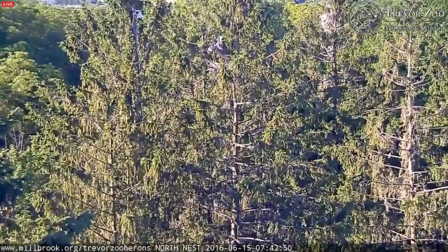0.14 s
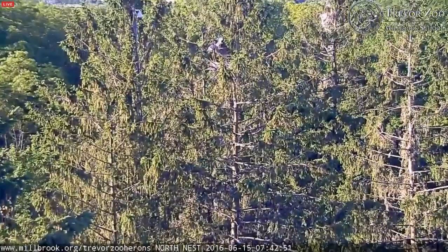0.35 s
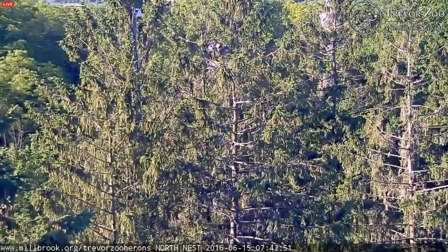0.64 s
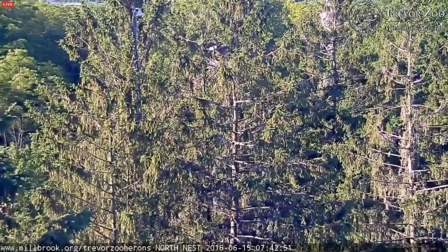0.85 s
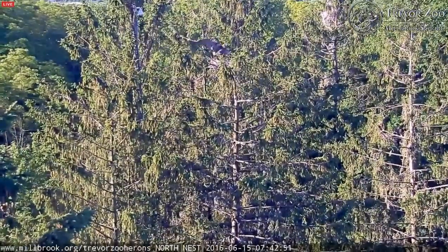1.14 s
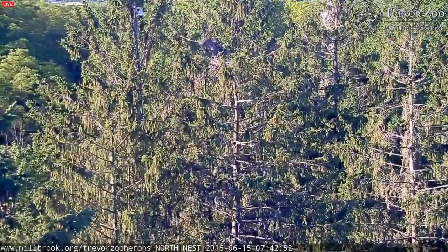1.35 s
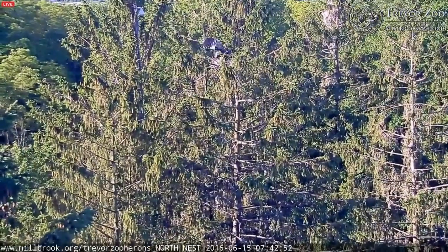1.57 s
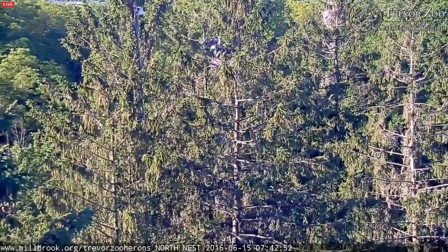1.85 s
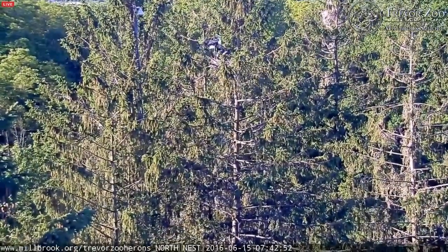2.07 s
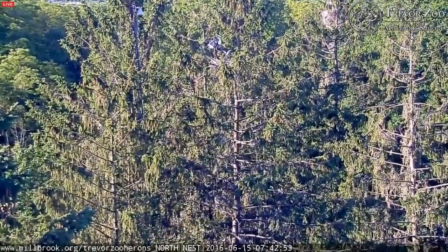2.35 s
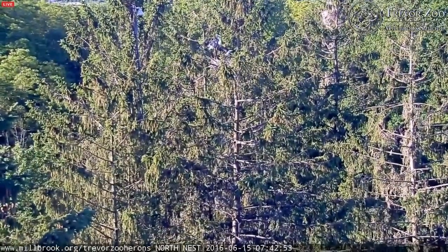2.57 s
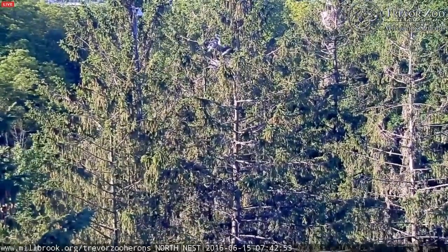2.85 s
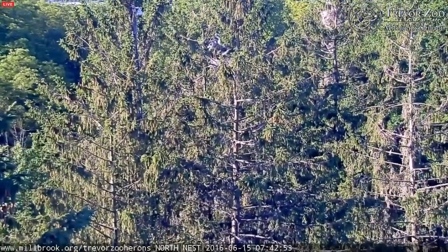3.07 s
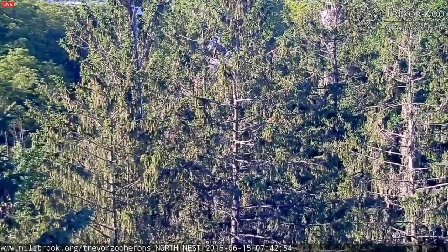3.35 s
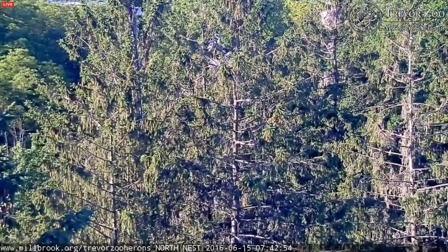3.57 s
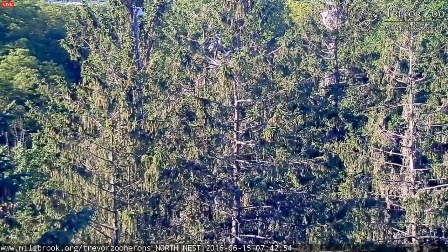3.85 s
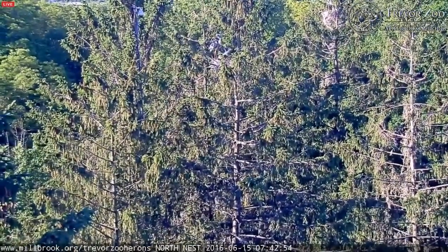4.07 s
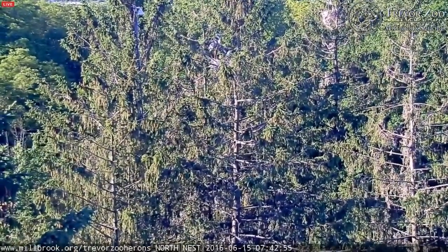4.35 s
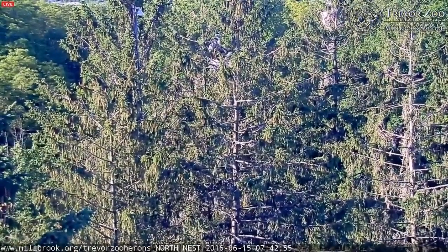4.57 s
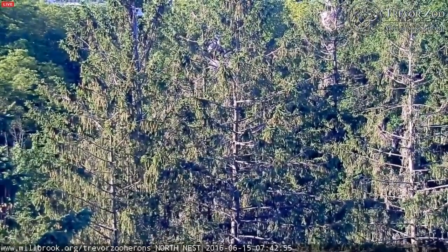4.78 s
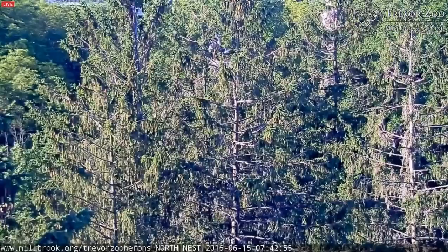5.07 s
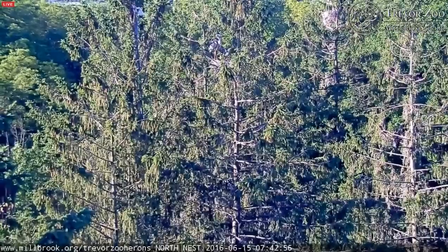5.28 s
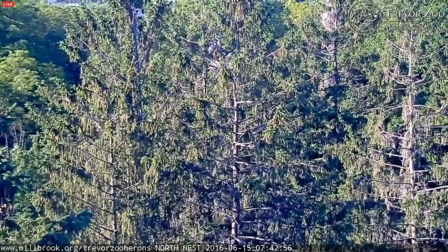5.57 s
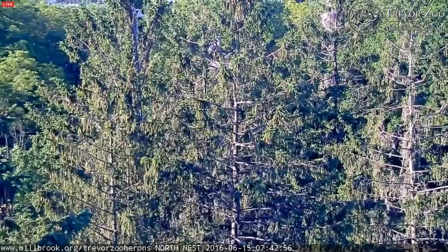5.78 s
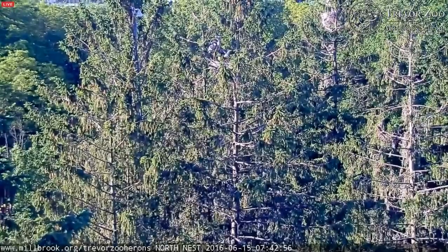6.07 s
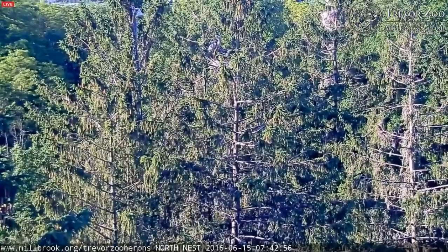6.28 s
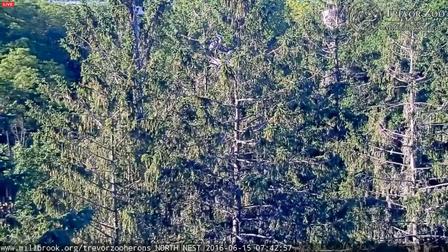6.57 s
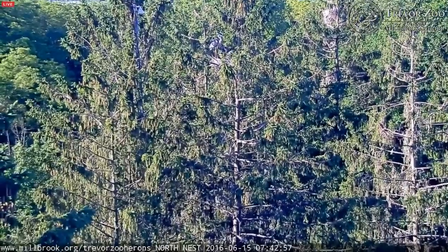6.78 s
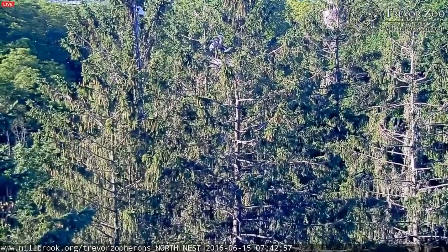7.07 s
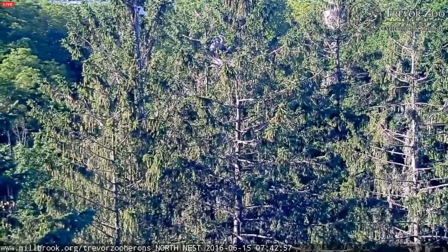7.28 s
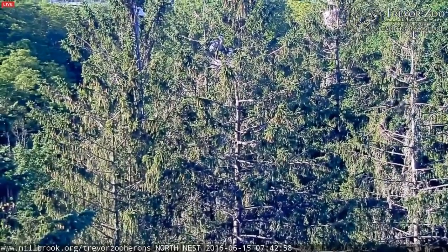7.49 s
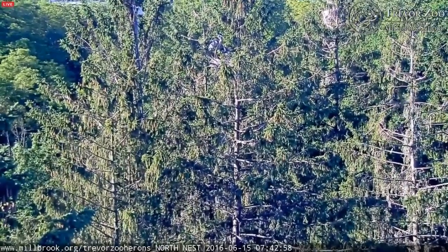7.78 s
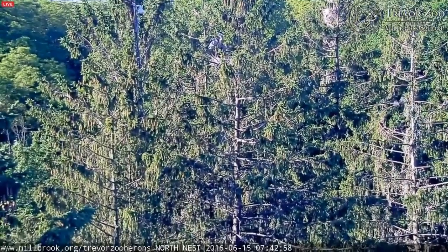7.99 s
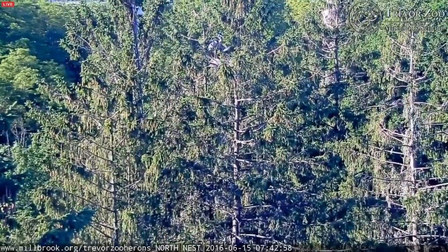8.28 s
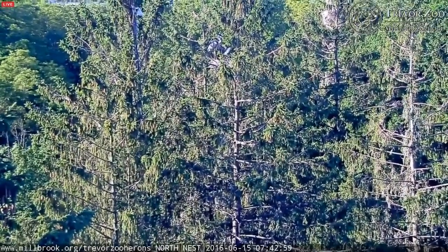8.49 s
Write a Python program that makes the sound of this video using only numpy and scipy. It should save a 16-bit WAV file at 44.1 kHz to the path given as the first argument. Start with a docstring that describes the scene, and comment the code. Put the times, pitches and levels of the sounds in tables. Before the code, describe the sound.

Heron chicks beg in rapid runs of harsh, clicking rattles from a treetop nest, with faint songbirds behind.

```python
"""Harsh begging calls of heron nestlings in a treetop: each opens with a tick, swells into a rattle and
trails off dully. Uneven throat pulses are the source; chest, throat and gape resonances are the filter.
A smaller chick squeaks between, soft gulps close some calls and a bill snaps once. Far songbirds
whistle and twitter, scattered by the trees. Leaves hiss, distant machinery hums, wind buffets the
microphone and an insect holds a thin high note."""
import sys
import numpy as np
from scipy import signal
from scipy.fft import rfft, irfft, next_fast_len
from scipy.io import wavfile
from scipy.ndimage import uniform_filter1d

SR = 44100
rng = np.random.default_rng(int(sys.argv[2]) if len(sys.argv) > 2 else 0)


def dump_mix(stems):
    """Bounce the given channels to the path in sys.argv[1] as a 16-bit WAV at rate SR."""
    frames = np.atleast_2d(stems).T  # one column per channel
    limited = np.clip(frames, -1, 1)  # hard clip at full scale
    pcm = np.round(limited * 32767).astype(np.int16)
    wavfile.write(sys.argv[1], SR, pcm)


N = 380583

# Begging calls, levels relative: start_s, tick_db, wait_s, nominal_rattle_s, rattle_db
BEGGING_CALLS = [(0.0351, -38, 0.018, 0.011, -30.5), (0.1892, -51.5, 0.0081, 0.021, -43),
                 (0.328, -52, 0.014, 0.019, -32), (0.4882, -51.5, 0.013, 0.016, -35.5),
                 (0.636, -56, 0.0037, 0.042, -37.5), (0.7869, -43.5, 0.009, 0.031, -37),
                 (0.9646, -35, 0.0039, 0.024, -33.5), (1.1248, -41, 0.0037, 0.04, -35),
                 (1.2986, -24.5, 0.0015, 0.024, -27), (1.4458, -35.5, 0.012, 0.021, -28),
                 (1.6019, -30, 0.0037, 0.034, -29), (1.659, -49, 0.00086, 0.029, -44),
                 (1.705, -50, 0.0009, 0.0052, -47), (2.06, -44, 0.001, 0.0052, -56),
                 (2.101, -68, 0.0011, 0.014, -56), (2.225, -40.5, 0.0011, 0.0038, -42),
                 (2.369, -37, 0.0039, 0.033, -43.5), (2.5024, -41.5, 0.002, 0.0087, -55.5),
                 (2.6197, -49.5, 0.001, 0.012, -54.5), (2.784, -48, 0.001, 0.012, -62),
                 (3.059, -45, 0.001, 0.025, -47.5), (3.2132, -48.5, 0.0045, 0.014, -58),
                 (3.316, -60.5, 0.0047, 0.005, -66), (3.3434, -53, 0.0026, 0.011, -53.5),
                 (3.4514, -45, 0.001, 0.0058, -47.5), (3.473, -70, 0.0037, 0.0088, -59),
                 (3.69, -62, 0.002, 0.0052, -59), (3.9677, -48, 0.015, 0.013, -36.5),
                 (4.1014, -47, 0.012, 0.031, -39), (4.233, -45, 0.007, 0.041, -39.5),
                 (4.3764, -37, 0.0026, 0.048, -32), (4.524, -47, 0.0023, 0.051, -37.5),
                 (4.6743, -50, 0.0039, 0.05, -41), (4.8465, -35.5, 0.0037, 0.033, -41),
                 (5.179, -48, 0.0051, 0.017, -48.5), (5.262, -31.5, 0.001, 0.038, -33.5),
                 (5.4033, -46, 0.0084, 0.046, -38.5), (5.576, -48, 0.0077, 0.03, -37.5),
                 (5.7327, -41, 0.004, 0.042, -39), (5.885, -45, 0.0043, 0.044, -34),
                 (6.0425, -46, 0.0061, 0.043, -39), (6.1995, -44.5, 0.01, 0.037, -36),
                 (6.3518, -45.5, 0.0054, 0.051, -39.5), (6.5161, -41.5, 0.0068, 0.039, -38.5),
                 (6.6761, -50, 0.0019, 0.043, -38.5), (6.8416, -42.5, 0.0054, 0.045, -42),
                 (7.011, -43, 0.0025, 0.044, -43), (7.3887, -41.5, 0.013, 0.023, -39),
                 (7.5329, -40.5, 0.0079, 0.032, -32.5), (7.6882, -45, 0.007, 0.041, -35.5),
                 (7.8521, -45, 0.0032, 0.043, -40.5), (8.006, -47, 0.013, 0.031, -39),
                 (8.1632, -46, 0.012, 0.031, -38.5), (8.32, -48, 0.0043, 0.042, -41.5),
                 (8.488, -45, 0.003, 0.038, -40)]
# Drift of the voice: time_s, pulse_rate_hz, chest_db, throat_db, rasp_db, nominal_gape_hz, trail_s
VOICE_DRIFT = [(0, 229.8, -16.5, -10.5, -32.5, 2890, 0.037), (1.0, 230.8, -18.5, -13.5, -32.5, 3093, 0.027),
               (1.65, 229, -22.5, -10, -30.5, 3015, .025), (2.0, 227.9, -27, -8, -26, 3040, 0.0085),
               (2.7, 227.1, -27, -20, -33, 2830, 0.018), (3.75, 230.5, -26, -17, -22, 3080, 0.0062),
               (3.952, 233.5, -15, -23, -26, 3120, 0.049), (4.3, 294.7, -17.5, -17, -26, 3020, 0.042),
               (4.549, 270, -18, -15, -27.5, 3050, .03), (4.899, 231.8, -15.5, -13.5, -26, 3030, 0.029),
               (5.268, 251.8, -19, -15, -24.5, 3150, 0.021), (5.449, 245.6, -16, -13.5, -26, 3140, 0.052),
               (5.798, 230.5, -18.5, -10.5, -35, 3060, 0.036), (6.3, 214.7, -18, -8, -30.5, 3180, 0.033),
               (7.0, 215.8, -16.5, -7.5, -29, 2954, 0.033), (7.6, 215.3, -16.5, -10.5, -36, 2994, 0.03),
               (8.5, 216.3, -17.5, -9, -25.5, 3024, 0.039)]
# Tilt that lifts the middle two gape resonances against the outer two: time_s, nominal_tilt_db
GAPE_TILT = [(0, 0.5), (1.7, 0), (3.7, 2), (4.0, 2.5), (4.45, 0.5), (4.6, 1.5), (5.3, 1.5), (5.9, 0),
             (6.4, -1), (7.0, 1.5), (8.5, -1)]
# Four groups of vocal tract resonances: centre_hz, width_hz, relative_gain_db
CHEST_MODES = [(260, 180, -1), (419, 82, 3), (645, 280, 1)]
THROAT_MODES = [(928, 225, -12.5), (1339, 189, 2), (1744, 264, 2.5)]
GAPE_MODES = [(2190, 140, -8.5), (2803, 272, 0.5), (3444, 477, -6.5), (4267, 578, -16)]
RASP_MODES = [(5540, 1160, 11), (7600, 6100, -6.5), (10350, 2600, -5)]
# Squeaks of the smaller chick: start_s, length_s, pitch_hz, source_db, throat_gain_db
SQUEAK_NOTES = [(2.654, 0.019, 672, -51, -15), (2.802, 0.015, 448, -50, -20), (2.953, 0.023, 445, -57, -20),
                (3.094, 0.022, 458, -55.5, -15)]
# Its timbre, one value per gape resonance: gain_db
SQUEAK_GAPE_DB = (4, 2.5, -8, -12)
# Gulps after some calls: start_s, level_db
GULP_NOTES = [(0.089, -72), (0.379, -61), (0.541, -66.5), (1.014, -66), (2.67, -67), (3.583, -69.5),
              (7.435, -72), (7.59, -76), (7.754, -81)]
# Bill snap: start_s, excitation_db
BILL_SNAPS = [(3.2894, -45)]
# Far songbird notes: start_s, length_s, start_hz, middle_hz, end_hz, relative_level_db
SONGBIRD_NOTES = [(.25, 0.15, 2550, 2580, 2460, -63), (.745, 0.045, 2420, 2430, 2360, -64),
                  (.91, 0.052, 2740, 2720, 2740, -62), (1.03, .05, 4490, 4240, 3950, -59),
                  (1.085, .04, 3900, 3600, 3440, -61), (1.37, 0.049, 3320, 3160, 3030, -54),
                  (4.91, 0.14, 2820, 2570, 2550, -63.5), (5.04, 0.087, 3840, 3800, 3920, -79),
                  (5.32, 0.054, 2730, 2630, 2510, -57), (5.838, 0.035, 3410, 3200, 3100, -55),
                  (5.97, 0.068, 3400, 4130, 3840, -61.5), (6.8, 0.1, 3360, 3280, 2950, -54)]
# Level of the loudest chirps of a flock further off: time_s, level_db
FLOCK_LEVELS = [(0, -72.5), (.9, -66.5), (1.06, -56.5), (1.4, -73.5), (3.3, -81), (4.08, -72), (4.5, -69),
                (7.3, -77), (7.75, -62.5), (8.6, -70.5)]
# Spectrum of leaf hiss and far rumble: frequency_hz, density_db_per_hz
AMBIENT_SPECTRUM = [(40, -106), (70, -107), (125, -106.5), (220, -93.5), (400, -96), (600, -103),
                    (900, -113), (1300, -113), (1900, -109), (2800, -94), (3600, -104), (5000, -120),
                    (6500, -127), (11500, -130), (15000, -139)]
# Tones of distant machinery: centre_hz, width_hz, level_db
MACHINE_TONES = [(107.6, 6.6, -89.5), (145.4, 4, -82), (215.2, 14, -74.5), (299, 13, -76), (353, 14, -74)]
# Wind on the microphone: time_s, level_db
WIND_LEVELS = [(0, -60), (.2, -103), (1.15, -80.5), (1.3, -66), (1.602, -81.5), (1.969, -67), (2.1, -74),
               (2.7, -82), (8.4, -91.5), (8.55, -68.5)]
# Drift of the insect's note: time_s, pitch_hz
INSECT_PITCH = [(0, 9800), (1.102, 10000), (3.502, 9930), (8.6, 9860)]


def begging(jitter=.08, spread_db=4.5, puff_db=-6, breath_db=-16, shut_ratio=.86, colour_spread_db=3):
    """Source and filter: uneven pulses, each a click with a puff of air, ring chest, throat and gape."""
    t = np.arange(SR // 5) / SR
    chance = rng.standard_normal((len(BEGGING_CALLS), 3, 64))
    air = rng.standard_normal((len(BEGGING_CALLS), 2, len(t)))
    puff_decay = np.exp(-t[:400] / .0015)
    when, *voice = np.transpose(VOICE_DRIFT)
    out = np.zeros(N + len(t))
    for call, (stretch, size, bill), (puff_noise, breath) in zip(BEGGING_CALLS, chance, air):
        start, tick_db, wait, rattle, rattle_db = call
        rate, chest_db, throat_db, rasp_db, gape_hz, trail = (np.interp(start, when, v) for v in voice)
        onsets = np.cumsum(np.clip(1 + jitter * stretch, .4, 2) / rate)
        onsets -= onsets[0]
        inside = onsets < t[-1]
        heights = undb(spread_db * np.clip(np.r_[0, size[1:]], -3, 1))
        clicks = np.zeros(len(t))
        clicks[(onsets[inside] * SR).astype(int)] = heights[inside]
        puffs = np.convolve(clicks, puff_decay)[:len(t)] * puff_noise
        source = level(level(clicks, 0) + level(puffs, puff_db) + level(breath, breath_db), 0)
        pressure = breath_pressure(t, tick_db, wait, rattle, rattle_db, trail)
        # Weak pressure loses the treble first; extra force goes less to chest and throat.
        bright = (pressure / pressure.max()) ** .4
        force_db = rattle_db + 38  # above a usual call
        gains = [undb(chest_db - .76 * force_db) / (bright + .54),
                 undb(throat_db - .32 * force_db) / (bright + .5), 1, undb(rasp_db) * bright]
        shut = np.clip(t / (wait + rattle + trail), 0, 1) ** 2
        tuning = gape_hz / 3030 * (1 + .025 * bill[-1])  # against the gape at rest
        tilt_db = contour(start, GAPE_TILT) * np.array([-.5, .37, .81, -.7])
        colour_db = colour_spread_db * bill[:4] + tilt_db
        drives = [source * pressure * gain for gain in gains]
        out[int(start * SR):][:len(t)] += tract(drives, tuning, shut_ratio * tuning, shut, colour_db)
    return out[:N]


def breath_pressure(t, tick_db, wait, rattle, rattle_db, trail, trail_db=-19):
    """Driving pressure sets the amplitude envelope of a call: a tick, an arched swell, a weak trail."""
    attack = np.clip(t / .0011 + .46, 0, 1)
    tick = undb(tick_db) * (np.exp(-t / .006) + .081) * (t < max(wait, .004)) * attack
    progress = np.clip((t - wait + .001) / (1.14 * max(rattle, .005)), 0, 1)
    swell = undb(rattle_db) * np.sin(np.pi * progress) ** .45
    end = wait + rattle + max(trail, .003)
    fade = undb(rattle_db + trail_db) * (t > wait) * np.clip((end - t) / .017, 0, 1)
    return np.maximum(np.maximum(tick, swell), fade)


def tract(drives, open_tuning, shut_tuning, shut, colour_db):
    """Parallel formants at unit power gain; the gape crossfades in tuning as the bill shuts (0-1)."""
    chest, throat, gape, rasp = drives
    open_modes, shut_modes = (
        [(hz * tuning, width, db + extra) for (hz, width, db), extra in zip(GAPE_MODES, colour_db)]
        for tuning in (open_tuning, shut_tuning))
    branches = [(chest, CHEST_MODES), (throat, THROAT_MODES), (gape * (1 - shut), open_modes),
                (gape * shut, shut_modes), (rasp, RASP_MODES)]
    impulse = signal.unit_impulse(4096)
    return sum(ring(drive, modes) / np.linalg.norm(ring(impulse, modes)) for drive, modes in branches)


def squeaks(chest_db=-14, rasp_db=-36, droop=.06, tuning=.99, breath_db=-13):
    """Voicing: breath and a pulse train of unsteady, slightly falling pitch excite fixed formants."""
    out, t = np.zeros(N), np.arange(SR // 10) / SR
    for start, length, hz, db, throat_db in SQUEAK_NOTES:
        air = rng.standard_normal(len(t))
        cycles = hz * t * (1 - droop * t / length / 2) + .2 * uniform_filter1d(air, 100)
        pulses = np.diff(np.floor(np.maximum.accumulate(cycles)), prepend=-1)  # one per cycle
        arch = np.sin(np.pi * np.clip(t / length, 0, 1))
        source = (level(pulses, db) + level(air, db + breath_db)) * arch
        drives = [source * undb(gain_db) for gain_db in (chest_db, throat_db, 0, rasp_db)]
        out[int(start * SR):][:len(t)] += tract(drives, tuning, tuning, 0, SQUEAK_GAPE_DB)
    return out


def gulps(length_s=.024, glide_hz=(1395, 1190, 1170)):
    """Fast random amplitude modulation makes each short, falling note hoarse."""
    hoarse = 1 + .4 * walk(700)
    return hoarse * notes([(start, length_s, *glide_hz, db) for start, db in GULP_NOTES], waver_db=1.5)


def bill_snap():
    """Impact excitation: a brief noise burst rings heavily damped modes, giving a bright, dry crack."""
    bursts, t = np.zeros(N), np.arange(1000) / SR
    for start, db in BILL_SNAPS:
        bursts[int(start * SR):][:len(t)] += undb(db) * np.exp(-t / .0015) * rng.standard_normal(len(t))
    return ring(bursts, [(1800, 1300, -8), (3630, 1600, 13.5), (6450, 2300, -16),
                         (9000, 2900, -28), (13500, 3400, -16)])


def songbirds():
    """Distance favours diffuse sound: whistles arrive smeared, the flock only by way of the trees."""
    whistles = notes(SONGBIRD_NOTES, waver_db=3.5)
    return undb(-7) * whistles + tree_scatter(undb(-4) * whistles + flock(), t60_s=.25)


def flock(count=1600, low_hz=3200, high_hz=4350):
    """Superposition: many short falling chirps at random moments merge into a twitter."""
    when, length, pitch, bend, faintness = rng.random((count, 5)).T
    start = when * (N / SR - .1)
    hz = low_hz + (high_hz - low_hz) * pitch
    db = contour(start, FLOCK_LEVELS) - 6 * faintness
    fall = 1 - .12 * bend
    chirps = np.transpose([start, .008 + .012 * length, hz, hz * fall, hz * fall ** 2, db])
    return notes(chirps, waver_db=1.5)


def tree_scatter(x, t60_s):
    """Scattering: trunks and boughs send back a diffuse, exponentially decaying tail."""
    t = np.arange(SR // 2) / SR
    tail = rng.standard_normal(len(t)) * np.exp(-np.log(1000) * t / t60_s) * np.clip(t / .0017, 0, 1)
    return signal.fftconvolve(x, tail / np.linalg.norm(tail))[:N]


def leaves_and_rumble(swell_db=.4, flicker_db=1.2):
    """Broadband noise of leaves and far rumble: half-octave bands swell together and flicker alone."""
    out, swell, size = 0, walk(.69), next_fast_len(N)
    f = np.fft.rfftfreq(size, 1 / SR) + 1
    hz, db = np.transpose(AMBIENT_SPECTRUM)
    density = undb(np.interp(np.log(f), np.log(hz), db))
    spectrum = rfft(rng.standard_normal(size)) * density * np.sqrt(SR / 2)
    for octave in np.arange(4, 14.5, .5):
        band = np.cos(np.pi * np.clip(np.log2(f) - octave, -.5, .5)) ** 2
        out += undb(swell_db * swell + flicker_db * walk(13)) * irfft(spectrum * band, size)[:N]
    return out


def machinery():
    """Narrowband noise: sharp resonances give the wavering low tones of a distant hum."""
    return sum(level(ring(rng.standard_normal(N), [(hz, width, 0)]), db)
               for hz, width, db in MACHINE_TONES)


def wind():
    """Turbulent pressure on the microphone: low noise that rises and falls with the gusts."""
    buffeting = level(ring(rng.standard_normal(N), [(113, 110, 0)]), 0)
    return undb(contour(np.arange(N) / SR, WIND_LEVELS)) * buffeting


def insect(level_db=-92.5):
    """Random frequency and amplitude modulation roughen a thin, drifting tone."""
    hz = contour(np.arange(N) / SR, INSECT_PITCH) + 70 * walk(220)
    flutter = undb(1.1 * walk(260))
    return level(flutter * np.sin(2 * np.pi * np.cumsum(hz) / SR), level_db)


def notes(table, waver_db):
    """Frequency glides: near-sine notes bend through three pitches and waver in level."""
    out, waver = np.zeros(N), undb(waver_db * walk(60))
    for start, length, *hz, db in table:
        progress = np.linspace(0, 1, int(length * SR))
        pitch = np.polyval(np.polyfit([0, .5, 1], hz, 2), progress)
        tone = np.sin(2 * np.pi * np.cumsum(pitch) / SR)
        out[int(start * SR):][:len(tone)] += undb(db) * np.sin(np.pi * progress) ** .5 * tone
    return np.sqrt(2) * waver * out


def ring(x, modes):
    """Resonances (centre_hz, width_hz, gain_db) of alternating sign, passed twice for dark valleys."""
    out = 0
    for k, (hz, width, db) in enumerate(modes):
        b, a = signal.iirpeak(hz, hz / (1.55 * width), SR)
        out += (-1) ** k * undb(db) * signal.lfilter(b, a, signal.lfilter(b, a, x))
    return out


def walk(rate_hz):
    """Low-pass noise of unit deviation: random steps, smoothed twice."""
    hold = int(SR / rate_hz)
    steps = np.repeat(rng.standard_normal(N // hold + 1), hold)
    wander = uniform_filter1d(uniform_filter1d(steps, hold), hold)[:N]
    return wander / np.std(wander)


def contour(time_s, table):
    """Linear interpolation between rows of time and value."""
    return np.interp(time_s, *np.transpose(table))


def undb(db):
    """Decibels as an amplitude ratio."""
    return 10 ** (np.asarray(db, float) / 20)


def level(x, db):
    """Scaling to a given RMS level."""
    return x * undb(db) / np.sqrt(np.mean(x ** 2))


def scene():
    """Superposition of the nest, its reflections and the background in one channel."""
    nest = begging() + squeaks() + gulps() + bill_snap()
    far_birds = songbirds()
    reflections = undb(-5) * tree_scatter(nest, t60_s=.076)
    return (nest + reflections + far_birds + leaves_and_rumble() + machinery() + wind() + insect())[None]


def record(dry, low_cut_hz=80, top_hz=15400):
    """Band limiting: the recorder thins the deep bass and cuts the top."""
    thinned = signal.sosfilt(signal.butter(2, low_cut_hz, "high", fs=SR, output="sos"), dry)
    return signal.sosfilt(signal.ellip(8, .2, 70, top_hz, fs=SR, output="sos"), thinned)


dry = scene()
out = record(dry)
dump_mix(out)
```